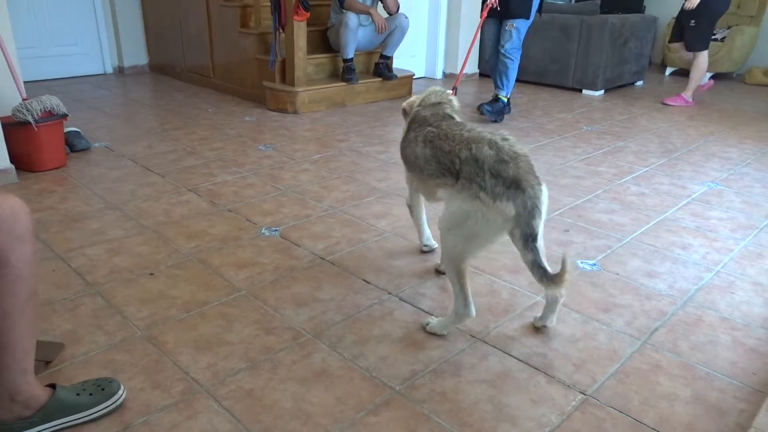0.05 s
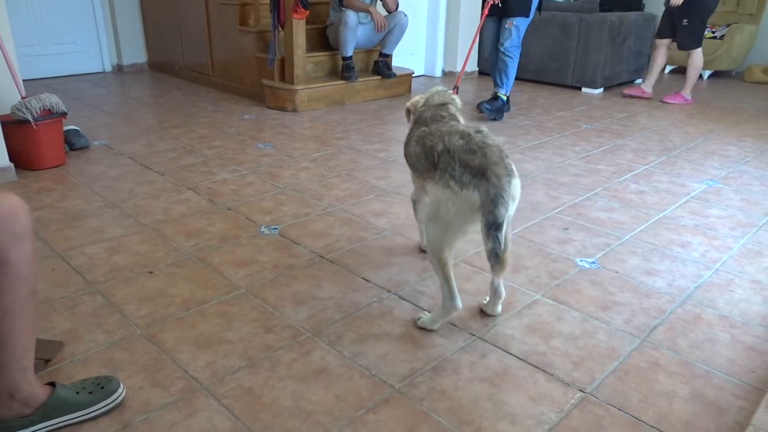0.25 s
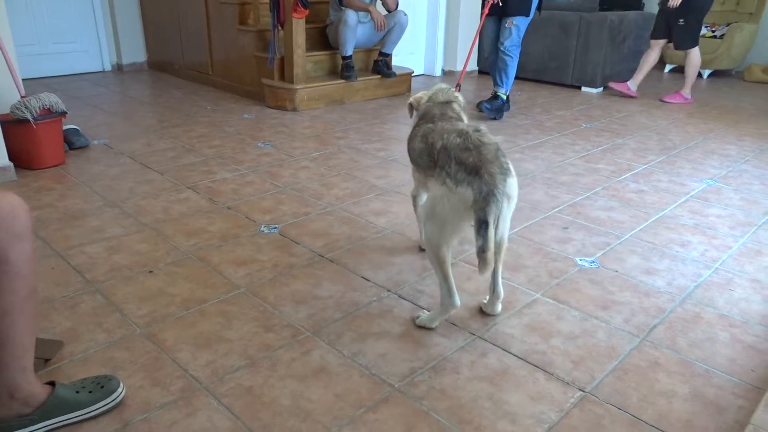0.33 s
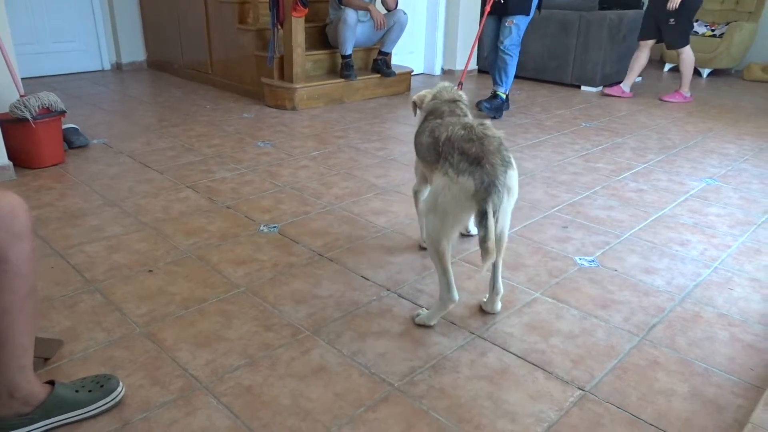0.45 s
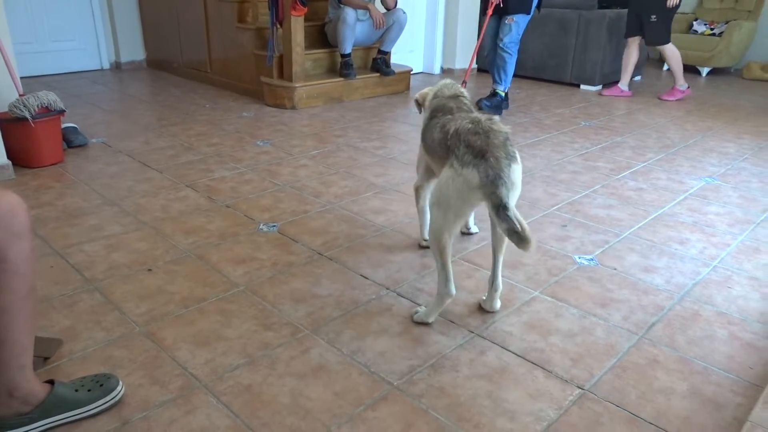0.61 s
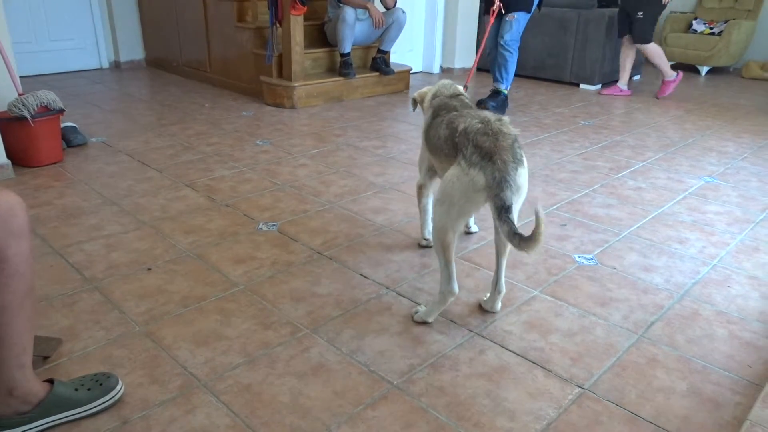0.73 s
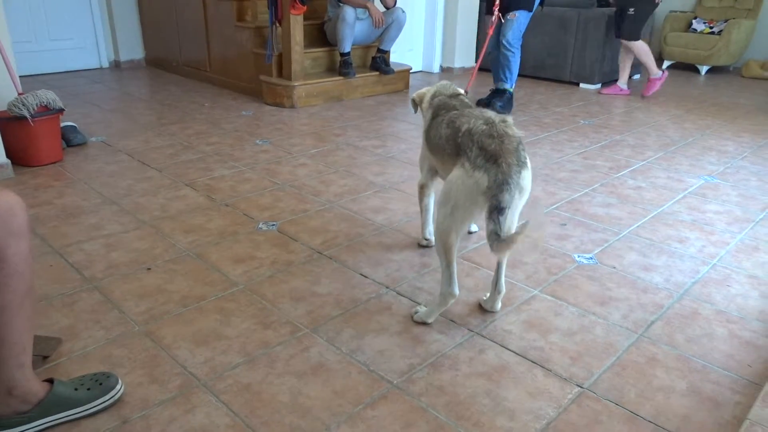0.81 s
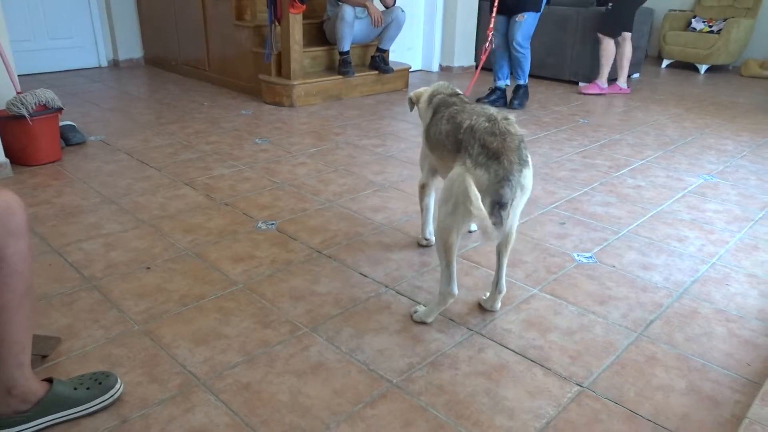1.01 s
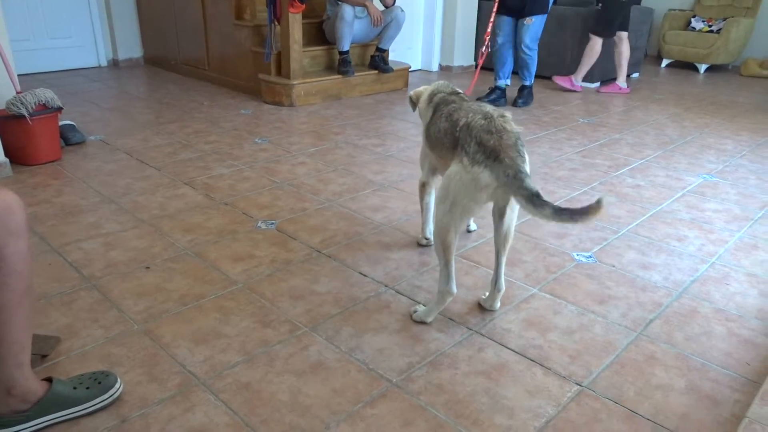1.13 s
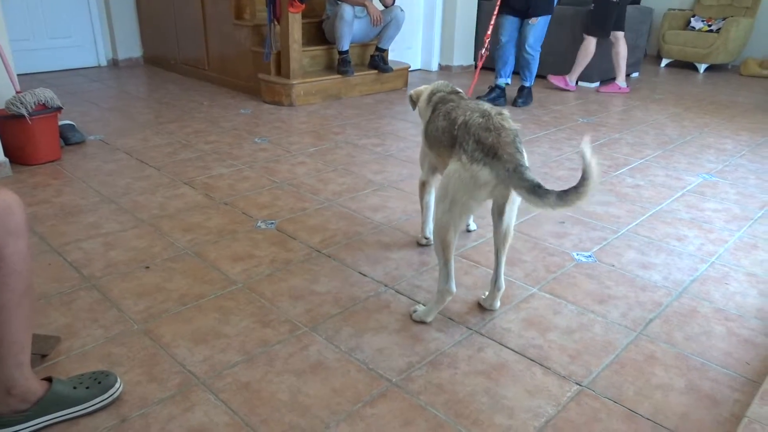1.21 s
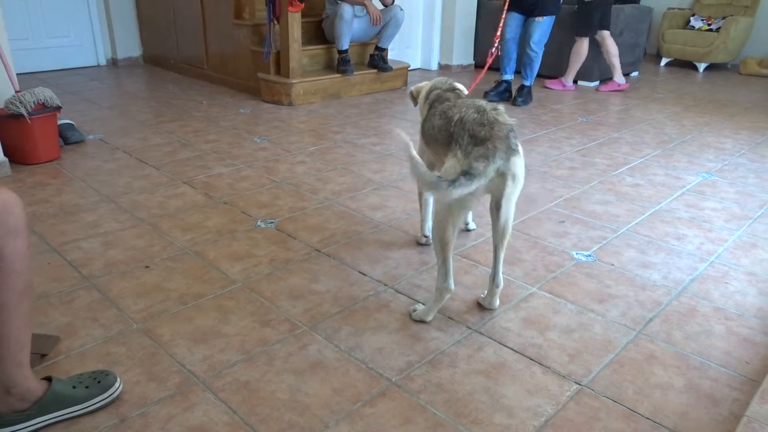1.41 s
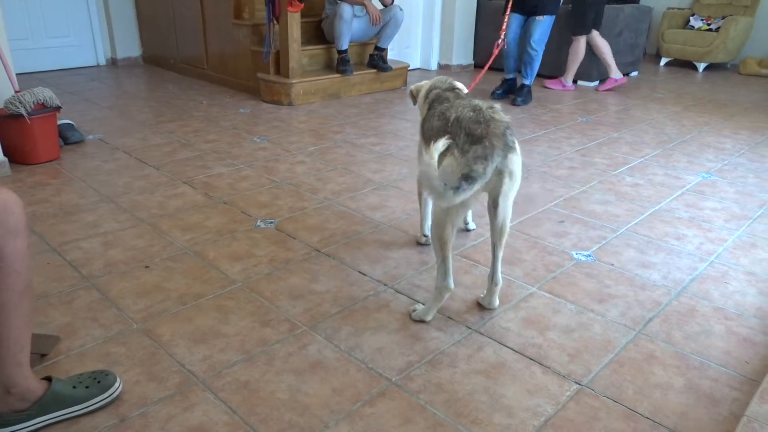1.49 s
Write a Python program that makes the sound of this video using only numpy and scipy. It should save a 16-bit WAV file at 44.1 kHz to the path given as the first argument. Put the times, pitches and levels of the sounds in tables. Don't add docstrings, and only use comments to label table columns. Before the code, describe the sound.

Dog's whine climbs from rough quiet moan to a long high nasal whistle, echoing off hard tiles

```python
import sys
import numpy as np
from scipy import signal
from scipy.fft import rfft, irfft
from scipy.io import wavfile
from scipy.ndimage import uniform_filter1d

SR = 44100
rng = np.random.default_rng(int(sys.argv[2]) if len(sys.argv) > 2 else 0)


def wav_out(sig):
    wavfile.write(sys.argv[1], SR, np.round(np.clip(np.atleast_2d(sig).T, -1, 1) * 32767).astype(np.int16))


def boost(x):
    u = np.asarray(x, float) / 20
    return 10 ** u


N = 68355
T = np.arange(N) / SR

# time_s, pitch_hz, effort_db, octave_db
WHISTLE = [
    (.262, 5254, -26, -35.5),
    (.36, 5206, -14.5, -31),
    (0.438, 5025, -22, -19.5),
    (0.477, 5154, -13.5, -34),
    (0.546, 5055, -21.5, -15),
    (0.588, 5105, -19, -31.5),
    (0.629, 5057, -21, -20.5),
    (.72, 5097, -23.5, -25),
    (0.987, 5108, -18.5, -31),
]


def evened(x):
    return x / np.sqrt(np.mean(x ** 2) + 1e-20)


def read(points, hz):
    f, value = np.transpose(points)
    return np.interp(np.log(hz + 1), np.log(f + 1), value)


def slow(width):
    once = uniform_filter1d(rng.standard_normal(N), int(width))
    return evened(uniform_filter1d(once, int(width)))


def span(start, end, rise, fall):
    return np.clip((T - start) / rise, 0, 1) * np.clip((end - T) / fall, 0, 1)


def resonate(x, hz, width):
    turn, r = np.exp(2j * np.pi * hz * T), np.exp(-np.pi * width / SR)
    return 2 * (turn * signal.lfilter([1 - r], [1, -r], x / turn)).real


def noise(shape, patchy_db):
    # freq_hz, likeness
    likeness = [(60, 0.99), (250, 0.7), (1000, 0.42), (2500, 0.25), (6000, 1), (10000, 0.42)]
    frames, hz = N // 128 + 5, np.fft.rfftfreq(512, 1 / SR)
    a, b, c, d, patches = rng.standard_normal((frames, 257, 5)).T
    patches = evened(uniform_filter1d(uniform_filter1d(patches, 8, 0), 20, 1))
    same = np.clip(read(likeness, hz), 0, 1)[:, None]
    left = a + 1j * b
    right = same * left + np.sqrt(1 - same ** 2) * (c + 1j * d)
    z = np.array([left, right])
    z *= boost(read(shape, hz)[:, None] + patchy_db * patches) * (hz[:, None] > 0)
    return evened(signal.istft(z, nperseg=512, noverlap=384)[1][:, :N])


def quiet_floor():
    # freq_hz, density_db (per Hz)
    hush = [(25, -58), (90, -18), (300, -5), (1430, -11.5), (2300, -17), (4500, -17), (7500, -13.5),
            (11000, -19.5)]
    return boost(-51.5) * noise(hush, patchy_db=1.5)


def fan():
    hz, width_hz, level_db = 286, 21, -63.5
    tone = resonate(resonate(rng.standard_normal(N), hz, width_hz), hz, width_hz)
    return boost(level_db) * evened(tone)


def room(x):
    # freq_hz, t60_s
    decay = [(150, 0.66), (700, 0.77), (1500, 1.17), (5000, 0.81), (10000, 0.41)]
    # freq_hz, likeness
    shared = [(200, 0.97), (5000, 0.91), (10000, 0.72)]
    taps = np.zeros((3, SR))
    at = np.arange(300, SR - 20, 20) + rng.integers(0, 20, (3, (SR - 301) // 20))
    np.put_along_axis(taps, at, rng.choice([-1., 1.], at.shape), 1)
    hz, t, z = signal.stft(taps, SR, nperseg=256)
    t60 = read(decay, hz)[:, None]
    common = np.clip(read(shared, hz), 0, 1)[:, None]
    z = common * z[2] + np.sqrt(1 - common ** 2) * z[:2]
    z = z * boost(-60 * t / t60) * np.sqrt(1 / t60)
    tail = signal.istft(z, SR, nperseg=256)[1]
    return signal.fftconvolve(x[None], tail / np.linalg.norm(tail[0]), axes=1)[:, :N]


def steps():
    # start_s, level_db
    footfalls = [(0.471, -68), (0.562, -73), (.8, -49.5), (1.018, -52), (1.088, -45.5), (1.154, -34),
                 (1.188, -39.5), (1.248, -73), (1.308, -37), (1.38, -58), (1.418, -60), (1.498, -47)]
    # mode_hz, t60_s, level_db
    modes = [(143, 0.14, 3), (222.5, 0.2, 3), (286, 0.61, -6), (456, .2, -30), (720, 0.06, -13)]
    push = np.zeros(N)
    for s, db in footfalls:
        push += boost(db) * (T > s) * np.exp(-np.maximum(T - s, 0) / 0.011)
    push = push * rng.standard_normal(N) + boost(-78) * rng.standard_normal(N)
    boom = np.zeros(N)
    for hz, t60, db in modes:
        boom += boost(db) * resonate(resonate(push, hz, 97), hz, 3.1 / t60 + 12)
    return boost(20) * boom


def scuffs():
    # start_s, length_s, level_db, centre_hz
    scrapes = [
        (-.01, 0.033, -50, 7500),
        (0.119, 0.061, -42.5, 8200),
        (0.265, 0.018, -81, 7000),
        (0.461, 0.056, -39, 7410),
        (0.965, 0.078, -53.5, 1780),
        (1.15, 0.056, -52.5, 3370),
    ]
    out = np.zeros(N)
    for s, length, db, hz in scrapes:
        grit = rng.standard_normal(N) * boost(3.8 * slow(23))
        scrape = evened(resonate(resonate(grit, hz, 6000), hz, 6000))
        out += boost(db) * span(s, s + length, 0.00067, 0.22 * length) * scrape
    return out


def breath():
    # freq_hz, density_db (per Hz)
    hiss = [(1500, -23), (3500, -9.5), (4500, -18), (5600, 2), (7000, -3), (9000, -0.5), (11000, -6)]
    # freq_hz, width_hz, level_db
    nose = [(6960, 100, -1.5), (7820, 240, -1.5), (3895, 126, -11.5)]
    level_db, fade_db = -44, -3.5
    air = noise(hiss, patchy_db=-2.0)
    nasal = sum(boost(db) * evened(resonate(rng.standard_normal(N), hz, width)) for hz, width, db in nose)
    air = air + nasal * boost(-4.5)
    start, end = WHISTLE[0][0], WHISTLE[-1][0]
    level = boost(level_db + fade_db * (T - start) / (end - start))
    return level * span(start - .03, end + 0.084, 0.061, 0.06) * air


def hum():
    # time_s, pitch_hz, level_db
    course = [
        (.46, 408, -62),
        (.55, 434, -54),
        (.61, 437, -48),
        (.67, 447, -56),
        (.76, 453, -53),
        (.82, 447, -62),
    ]
    s, hz, db = np.transpose(course)
    turn = 2 * np.pi * np.cumsum(np.interp(T, s, hz) + 6 * slow(460)) / SR
    return boost(np.interp(T, s, db)) * span(s[0], s[-1], 0.0088, 0.011) * np.sin(turn) * np.sqrt(2)


def moan():
    # time_s, pitch_hz, effort_db, chest_db
    course = [
        (0, 770, -67, 9.5),
        (.075, 780, -42.5, 4),
        (.105, 690, -38, 3),
        (0.219, 666.6, -34, -1.5),
        (0.382, 683.6, -38, 5.5),
        (0.499, 664.6, -40, 0.5),
        (0.602, 670.3, -55, 16),
        (0.722, 690, -60.5, -15),
        (.92, 678, -51.5, -16),
    ]
    # freq_hz, width_hz, level_db
    throat = [(690, 266, -8), (1320, 245, 2.5), (1790, 810, -18), (1990, 240, -11), (2390, 480, -11)]
    jitter, rough = .055, .48
    s, hz, db, chest_db = np.transpose(course)
    turns = np.cumsum(np.interp(T, s, hz) * (1 + jitter * slow(250))) / SR
    folds = sum(np.cos(2 * np.pi * k * turns) for k in range(1, 5))
    puffs = (0.9 + np.exp(-(turns % 1) / 0.9)) * rng.standard_normal(N)
    drive = (1 - rough) * evened(folds) + rough * 3 * evened(puffs)
    chest = np.interp(T, s, chest_db)
    voice = np.zeros(N)
    for k, (f, width, gain_db) in enumerate(throat):
        formant = resonate(resonate(drive, f, width), f, width)
        voice += (-1) ** k * boost(gain_db + (k == 0) * chest) * formant
    level = boost(np.interp(T, s, db) + 2.36 * slow(225))
    return level * span(s[0], s[-1], 0.0085, 0.07) * evened(voice)


def ring():
    level_db, t60_s = -22, 0.46
    end, hz = WHISTLE[-1][:2]
    pair = np.sin(2 * np.pi * hz * T) + 0.26 * np.sin(2 * np.pi * (hz - 19) * T)
    level = boost(level_db - 60 * np.abs(T - end) / t60_s + 3.6 * slow(340))
    return level * span(end + 0.0013, 2, 0.0038, .1) * pair


def whistle():
    cancels = [.379, .409, .438, .462, .499, .545, .561, .589, .614, .641, .680, .734, .803, .841, .885,
               .926, .951, .987]
    scoop_s, scoop_hz, scoop_db = .05, 500, -24
    drop_s, drop_hz, drop_db = .03, 680, -30
    wobble_hz, ends_rough_hz, octave_ends_db = 7, 70.6, 42.5
    wall_echo = 0.7
    s, hz, db, octave_db = np.transpose(WHISTLE)
    before = np.clip((s[0] - T) / scoop_s, 0, 1)
    after = np.clip((T - s[-1]) / drop_s, 0, 1)
    ends = before + after

    pitch = uniform_filter1d(np.interp(T, s, hz), 350) - scoop_hz * before ** 1.9 - drop_hz * after ** 0.96
    pitch = pitch + wobble_hz * slow(406) + ends_rough_hz * ends * slow(37)
    turn = 2 * np.pi * np.cumsum(pitch) / SR
    level = boost(np.interp(T, s, db) + scoop_db * before + drop_db * after ** .8 + .6 * slow(225))
    level *= span(s[0] - scoop_s, s[-1] + drop_s, 0.0068, 0.016) * np.sqrt(2)

    count = len(cancels)
    at = np.r_[cancels[0] - .025, cancels, cancels[-1] + .012]
    slip = 2 * np.pi * np.interp(T, at, np.r_[0, np.arange(count) + .5, count])
    both = (np.sin(turn + slip / 2) + wall_echo * np.sin(turn - slip / 2)) / (1 + wall_echo)
    octave_level = boost(np.interp(T, s, octave_db) + octave_ends_db * ends + 3.7 * slow(750))
    return level * both, level * octave_level * np.sin(2 * turn), np.sqrt(ends)


def scene():
    tone, octave, ends = whistle()
    rest = moan() + hum() + scuffs() + boost(-1.5) * steps()
    to_room = boost(-2.5) * rest + boost(-9 + 9.2 * ends) * tone + boost(-6 + 18 * ends) * octave
    near = boost(-4 * ends) * tone + ring() + boost(-3 * ends) * octave + boost(-2.5) * rest
    return near + room(to_room) + breath() + fan() + quiet_floor()


def top_cut(x):
    return signal.sosfilt(signal.butter(12, 11810, fs=SR, output="sos"), x)


def record(dry):
    # freq_hz, level_db
    right_over_left = [(100, -0.7), (2000, -1), (5000, 2.5), (10000, 1.5)]
    edge_hz = 11150
    tilt = boost(read(right_over_left, np.fft.rfftfreq(N, 1 / SR)) / 2 * np.array([[-1], [1]]))
    tilted = irfft(rfft(dry) * tilt, N)
    low_pass = signal.firwin(255, edge_hz, window=("kaiser", 6), fs=SR)
    mix = signal.oaconvolve(tilted, low_pass[None], "same")
    return top_cut(mix)


dry = scene()
out = record(dry)
wav_out(out)
```